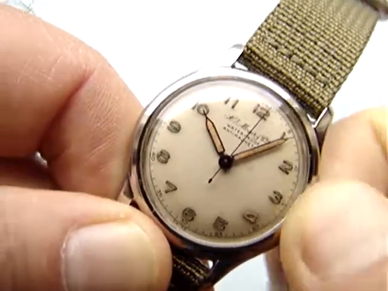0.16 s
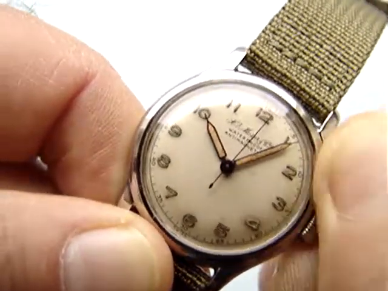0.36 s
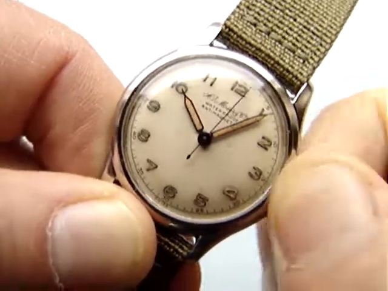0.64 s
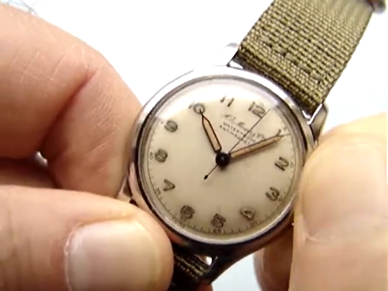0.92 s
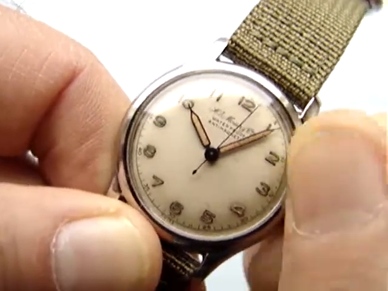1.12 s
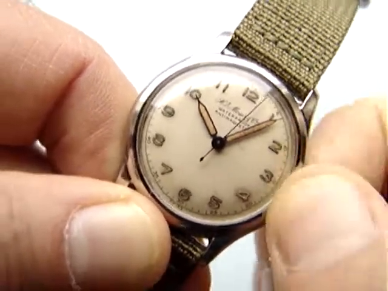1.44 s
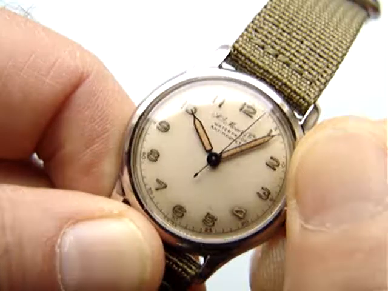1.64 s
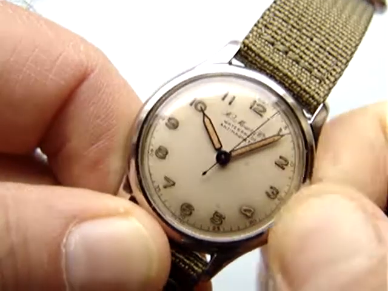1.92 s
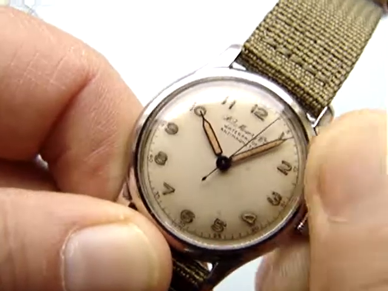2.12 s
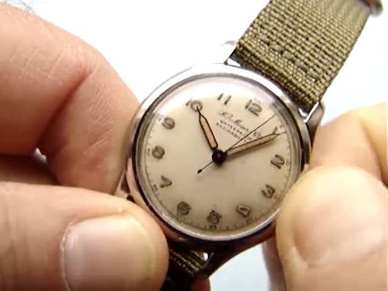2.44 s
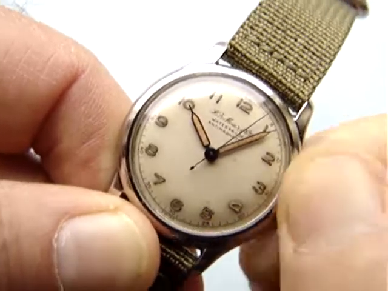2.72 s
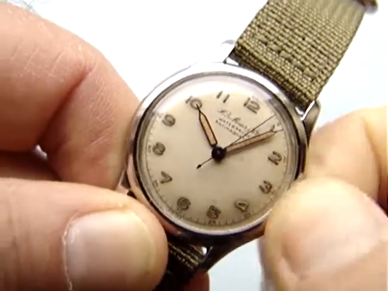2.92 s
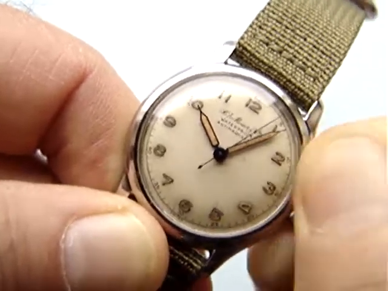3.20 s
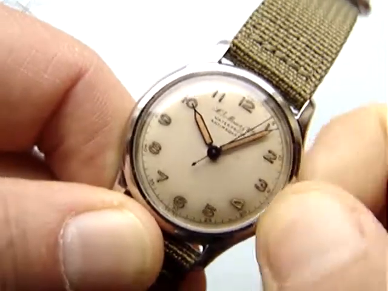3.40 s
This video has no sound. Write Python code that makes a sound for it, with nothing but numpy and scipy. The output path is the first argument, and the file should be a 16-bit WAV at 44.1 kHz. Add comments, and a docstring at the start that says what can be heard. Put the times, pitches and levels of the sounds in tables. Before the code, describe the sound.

Close to the microphone, fingers wind a watch back and forth, making quick bursts of dry ratchet clicks, fuller and thinner by turns. Light handling taps and skin rubs sit over the hiss of a quiet room.

```python
"""Short runs of crisp little clicks: a wristwatch is wound by hand, close up in a quiet room.
The crown (the winding knob) is rolled to and fro. On winding strokes a tiny catch, the pawl, snaps
over a toothed wheel and rings the case; on return strokes the clutch slips with thinner clicks.
Fingers rub on the crown between strokes. Soft handling bumps, light taps and one thin squeak
sound over steady room hiss, a faint hum and a low rush that swells and fades."""
import sys
import numpy as np
from scipy import signal
from scipy.fft import rfft, irfft, next_fast_len
from scipy.io import wavfile
from scipy.ndimage import uniform_filter1d, map_coordinates

SR = 44100
rng = np.random.default_rng(int(sys.argv[2]) if len(sys.argv) > 2 else 0)


def dump(signal):
    """Clip the signal to [-1, 1] and save it as 16-bit WAV at the path in sys.argv[1]."""
    limited = np.clip(np.atleast_2d(signal).T, -1, 1)
    pcm = np.round(limited * 32767).astype(np.int16)
    wavfile.write(sys.argv[1], SR, pcm)


N = 156996
TIME = np.arange(N) / SR


def amp(db):
    """Turn decibels into a number to multiply by."""
    return 10 ** (np.asarray(db) / 20)


def unit(x):
    """Scale a sound to an average strength (rms) of 1."""
    return x / np.sqrt(np.mean(x ** 2) + 1e-20)


def add(track, s, sound):
    """Mix a sound into the track, starting at s seconds."""
    i = max(round(s * SR), 0)
    track[i:i + len(sound)] += sound[:max(len(track) - i, 0)]


def filtered(x, response):
    """Turn each frequency in x up or down by response(hz)."""
    size = next_fast_len(N + 8192)
    hz = np.fft.rfftfreq(size, 1 / SR)
    return irfft(rfft(x, size) * response(hz), size)[..., :N]


def coloured(x, colour):
    """Give x a tone colour (which pitches are strong or weak), at strength 1."""
    points_hz, db = np.transpose(colour)
    return unit(filtered(x, lambda hz: amp(np.interp(np.log(hz + 1), np.log(points_hz), db))))


def wobble(rate):
    """A smooth random curve through `rate` new values a second."""
    points = rng.standard_normal(int(N * rate / SR) + 4)
    return map_coordinates(points, [TIME * rate])


def ring(tones, t, scatter_db=1.2, detune=.005):
    """A struck part's tones differ a little on every blow; each drops 60 dB in its ring time."""
    hz, db, ring_s = np.transpose(tones)[:, :, None]
    size, pitch = rng.standard_normal((2, len(tones), 1))
    t = np.maximum(t, 0)
    fade = amp(db + scatter_db * size - 60 * t / ring_s)
    return (fade * np.sin(2 * np.pi * hz * (1 + detune * pitch) * t)).sum(0)


# Tone colour of the room noise (frequency [Hz], relative level [dB])
ROOM_COLOUR = [(25, -20.5), (38, -17.5), (50, -7), (62, -5), (78, -11), (100, -3), (135, -3), (200, -0.5),
               (400, -4), (620, -5.5), (1150, -9), (2100, -11), (2300, -7.5), (2450, -10.5), (2750, -12.5),
               (3400, -12), (4000, -13), (4500, -26.5), (5200, -51)]
# Humming tones (frequency [Hz], level [dB])
HUM_TONES = [(57, -83), (133, -73.5), (168, -71.5), (219, -74)]
def room():
    """Steady low room noise with a slightly wavering hum."""
    air = amp(-59) * coloured(rng.standard_normal(N), ROOM_COLOUR)
    hum = sum(amp(db) * np.sqrt(2) * np.sin(2 * np.pi * hz * TIME + .65 * wobble(12))
              for hz, db in HUM_TONES)
    return air + hum


# Tone colour of the hiss (frequency [Hz], relative level [dB])
HISS_COLOUR = [(3600, -30), (4300, -5), (4700, -2), (5150, -.5), (5600, -3), (6400, -2), (8000, -2.5),
               (9600, -3), (10200, -4), (13000, -12)]
def hiss(whine_hz=6414, dip_db=-31, before_s=.0216, after_s=.0282):
    """High hiss with a thin whine; both dip briefly around each winding or return click."""
    noise = amp(-63.6) * coloured(rng.standard_normal(N), HISS_COLOUR)
    whine = amp(-74) * np.sqrt(2) * np.sin(2 * np.pi * whine_hz * TIME + .6 * wobble(50))
    near_click = np.zeros(N)
    for s, *_ in WINDING_CLICKS + RETURN_CLICKS:
        add(near_click, s - before_s, np.ones(round((before_s + after_s) * SR)))
    gain = uniform_filter1d(amp(dip_db * (near_click > 0)), round(.0025 * SR))  # soften the edges
    return gain * (noise + whine)


def friction(rows, colour, grain_db):
    """Skin grips metal unevenly, making grainy noise in strokes that start and stop softly."""
    strokes = sum(amp(db) / (1 + (2 * (TIME - s) / length) ** 4) for s, length, db in rows)
    grainy = rng.standard_normal(N) * amp(grain_db * wobble(800))
    return strokes * coloured(grainy, colour)


# Finger rubs (middle time [s], length [s], level [dB])
RUB_STROKES = [(0.018, 0.0175, -54.5), (0.41, 0.0234, -51), (0.535, 0.0203, -47), (0.692, 0.0154, -59.5),
               (1.24, 0.015, -54.5), (1.832, 0.0386, -55), (2.318, 0.0173, -47), (2.829, 0.0141, -49.5),
               (3.178, 0.0216, -55.5), (3.294, 0.0145, -52.5), (3.457, 0.0179, -58)]
# Their tone colour (frequency [Hz], relative level [dB])
RUB_TONE = [(1500, -40), (2200, -6), (2800, 7), (3500, -7), (4300, -11), (5100, -5), (5700, -14), (7000, 0),
            (7600, -1), (8300, 6), (9000, 9), (9600, 5), (10500, -6)]
def finger_rubs():
    """Fingers slide on the crown with a short, bright rasp."""
    return friction(RUB_STROKES, RUB_TONE, grain_db=4)


SLIDE_S, RISE_S = .0034, .00006  # a tooth slides just before the snap; the ringing then builds up
def snap(tones, bounce_db=-12, chatter_db=-1):
    """One steel part's share of a click: a slide, a snap and one bounce, with a fine rattle."""
    t = np.arange(SR // 40) / SR
    since_snap = t - SLIDE_S
    bounce_s = .0024 * (1 + .2 * rng.uniform(-1.056, 1))
    bounce_gain = amp(bounce_db + 2 * rng.normal())
    ringing = ring(tones, since_snap) + bounce_gain * ring(tones, since_snap - bounce_s)
    ringing *= 1 - np.exp(-np.maximum(since_snap, 0) / RISE_S)
    # the rattle grows during the slide and dies away after the snap
    rattle_db = np.where(since_snap < 0, -7.5 + 4500 * since_snap, -60 * since_snap / .011)
    rattle = rng.standard_normal(len(t)) * amp(rattle_db)
    muted = ring(tones, t) * amp(-60 * t / .009)  # parts that still touch mute each other
    chatter = signal.fftconvolve(rattle, muted)[:len(t)]
    # nothing of the part sounds below its lowest tone
    low_cut = signal.butter(6, tones[0][0] * .95, 'highpass', fs=SR, output='sos')
    click = signal.sosfilt(low_cut, unit(ringing) + amp(chatter_db) * unit(chatter))
    return click * np.sqrt(.005 * SR / np.sum(click ** 2))  # as much energy as 5 ms at strength 1


# Ringing tones of three steel parts (frequency [Hz], relative level [dB], ring time [s])
PAWL_TONES = [(8400, -1.5, .012), (8850, 0, .009), (9310, -2, .009), (9870, -10, .012)]
PLATE_TONES = [(4780, -8, .009), (5100, -2.5, .011), (5780, -8, .009), (6430, -5, .009), (6820, -2.5, .01),
               (7270, 1.5, .01), (7650, -7, .007)]
CASE_TONES = [(2300, -16, .009), (2790, 0, .008), (3650, -15, .006), (4100, -7, .008), (4620, -9, .007)]
def clicks(rows, pawl_db, plate_db, case_db, light=False):
    """Each tooth rings the pawl, the plate holding the gears and the case, each at its own volume."""
    case_tones = CASE_TONES[:2] if light else CASE_TONES  # a light touch rings only the lowest two
    track = np.zeros(N)
    for s, base_db, plate_extra, case_extra in rows:
        pawl = amp(pawl_db) * snap(PAWL_TONES)
        plate = amp(plate_db + plate_extra) * snap(PLATE_TONES)
        case = amp(case_db + case_extra) * snap(case_tones, bounce_db=-22, chatter_db=-12)
        add(track, s - SLIDE_S - 2 * RISE_S, amp(base_db) * (pawl + plate + case))
    return track


# Winding clicks (time [s], base level [dB], extra for the plate [dB], extra for the case [dB])
WINDING_CLICKS = [(0.0586, -39.5, -3, 0), (0.0753, -34, -32.5, -6.5), (0.0934, -35.5, -6, -5),
                  (0.115, -43.5, -0.5, -1), (0.1516, -45.5, 4, 3.5), (0.574, -35, -9, -4.5),
                  (0.6141, -36.5, -11.5, -4), (0.6437, -36.5, -11, -9), (0.6749, -36.5, -10, -2),
                  (0.7586, -39, -6.5, -5.5), (1.2859, -35, -12.5, -10), (1.304, -41, -3.5, 2.25),
                  (1.3276, -37, -10.5, -2.5), (1.3637, -39.5, -2, 0), (1.4038, -38.5, -0.5, -4),
                  (1.8759, -34, -8.5, -6.5), (1.8954, -40.5, -6, 1), (1.9138, -35, -8.5, -3.5),
                  (1.94, -36, -4.5, -4), (2.3597, -35.5, -6.5, -1), (2.3805, -38.5, -7.5, 1.5),
                  (2.3987, -43, 1, 3.5), (2.419, -37, -3.5, -3.5), (2.8552, -36, -17.5, 0.7),
                  (2.8682, -34.5, -7.5, -6.5), (2.8821, -34.5, -3.5, -5.5), (2.8969, -46.5, 3, 9.5),
                  (2.92, -33, -9.5, -14), (3.3372, -32.5, -8, -6.5), (3.374, -39, -1.5, 1.3),
                  (3.394, -38, -9, 1.5), (3.4095, -49, 10.5, 9.5), (3.423, -39, -13, 0.5),
                  (3.4442, -37, -5.5, -2.5)]
def winding():
    """The pawl snaps over the toothed wheel and rings the case."""
    return clicks(WINDING_CLICKS, pawl_db=-5, plate_db=-3.5, case_db=-5)


def knocks(rows, tones, rise_s):
    """Soft knocks whose ringing takes a moment to build up."""
    track = np.zeros(N)
    t = np.arange(SR // 4) / SR
    rise = 1 - np.exp(-t / rise_s)
    for s, db in rows:
        add(track, s, amp(db) * rise * ring(tones, t, scatter_db=2, detune=.0089))
    return track


# Handling bumps (time [s], base level [dB])
BUMP_HITS = [(0.085, -48), (2.916, -44)]
# Their tones (frequency [Hz], relative level [dB], ring time [s])
BUMP_TONES = [(177.3, -15, 0.09), (730.4, 0.5, 0.114), (777, 3, 0.0395), (1129.3, -3.5, 0.043),
              (1665, 0.5, 0.0397)]
def bumps():
    """Handling the watch makes dull bumps."""
    return knocks(BUMP_HITS, BUMP_TONES, rise_s=.00205)


# Faint ticks (time [s], base level [dB], extra for the case [dB])
SLACK_TICKS = [(0.239, -64, 8), (0.5345, -55, 7.5), (1.2519, -53, -3.5), (1.841, -58.5, 1.5),
               (2.037, -58.5, 1.5), (2.543, -62, 7.5), (2.831, -56, 3.5), (3.296, -50.5, -11.5)]
def gear_slack():
    """The gears tick faintly as they take up slack."""
    rows = [(s, db, -7, case_extra) for s, db, case_extra in SLACK_TICKS]
    return clicks(rows, pawl_db=-3, plate_db=4.5, case_db=2, light=True)


# Return clicks (time [s], base level [dB], extra for the plate [dB])
RETURN_CLICKS = [(0.3138, -39, -4.5), (0.3302, -40.5, -1.76), (0.346, -41.5, -0.5), (0.3632, -44, 2),
                 (0.3784, -38.5, -5.5), (0.9903, -40.5, -4), (1.013, -39.5, -3.5), (1.0344, -40.5, -3),
                 (1.0556, -40.5, -1.5), (1.077, -37, -9), (1.6047, -39.5, -4), (1.6201, -43.5, -1.5),
                 (1.6339, -38.5, -3.5), (1.649, -41.5, -1.5), (1.6676, -37.5, -8), (2.109, -38, -7),
                 (2.1254, -41.5, -1), (2.1414, -40.5, -1.9), (2.1554, -38, -7), (2.1687, -37.5, -5.5),
                 (2.607, -38, -6.5), (2.6232, -38, -4.5), (2.642, -38.5, -4.5), (2.6682, -37.5, -8.5),
                 (3.0666, -39, -3), (3.0803, -38.5, -5), (3.0973, -42.5, 1), (3.114, -40, -3.5),
                 (3.1285, -37, -5), (3.1431, -38.5, -2.5), (3.159, -37.5, -4)]
def slipping_clutch():
    """As the crown rolls back, the clutch slips with thin clicks that hardly ring the case."""
    rows = [(s, db, plate_extra, -17) for s, db, plate_extra in RETURN_CLICKS]
    return clicks(rows, pawl_db=-3.5, plate_db=-2.5, case_db=-3, light=True)


# Skin scuffs (middle time [s], length [s], level [dB])
SCUFF_STROKES = [(0.415, 0.065, -63), (3.158, 0.0355, -52.5)]
# Their tone colour (frequency [Hz], relative level [dB])
SCUFF_TONE = [(300, -15), (650, -4), (1000, -3.5), (1400, -5), (1800, -4.5), (2700, -6.5), (4000, -12),
              (9000, -50)]
def scuffs():
    """Skin brushes the case, duller than the rubs on the crown."""
    return friction(SCUFF_STROKES, SCUFF_TONE, grain_db=2)


# Light taps (time [s], base level [dB])
TAP_HITS = [(0.635, -40), (1.7365, -40)]
# Their tones (frequency [Hz], relative level [dB], ring time [s])
TAP_TONES = [(1071, -4.5, 0.0206), (1486, -1.5, 0.018), (1562.4, -3.5, 0.0282), (2382, -20.5, 0.047)]
def taps():
    """Light touches ring higher and shorter than the bumps."""
    return knocks(TAP_HITS, TAP_TONES, rise_s=.00139)


# Rise and fall of the squeak (share of its length [0 to 1], strength [0 to 1])
SQUEAK_OUTLINE = [(0, 0.114), (.14, 0.92), (.4, 0.94), (.55, 0.46), (1, 0.0033)]
def squeak(start_s=.8456, length_s=.1, hz=2854, sag_hz=30):
    """A thin raspy tone, barely there at first, swells, sags in pitch and fades."""
    progress = np.clip((TIME - start_s) / length_s, 0, 1)
    phase = 2 * np.pi * np.cumsum(hz - sag_hz * progress) / SR + .3 * wobble(330)
    rasp = amp(-54 + 3 * wobble(300))
    return rasp * np.interp(progress, *np.transpose(SQUEAK_OUTLINE)) * np.sin(phase)


# Loudness of the low rush (time [s], level [dB])
RUSH_LEVELS = [(1.6, -76), (1.9, -65), (2.27, -60), (2.5, -64), (2.9, -71.5), (3.5, -76.5)]
# Its tone colour (frequency [Hz], relative level [dB])
RUSH_COLOUR = [(200, -32), (330, -1.5), (385, -4), (435, -1.5), (480, -6.5), (540, -14), (620, -8),
               (850, -47.5)]
def low_rush():
    """A low rush slowly swells and fades in the background."""
    swell = amp(np.interp(TIME, *np.transpose(RUSH_LEVELS)))
    return swell * coloured(rng.standard_normal(N), RUSH_COLOUR)


# Changes of grip (middle time [s], length [s], level [dB])
GRIP_MOVES = [(2.94, 0.045, -53.5), (3.36, 0.392, -63.5)]
# Their tone colour (frequency [Hz], relative level [dB])
GRIP_COLOUR = [(100, -30), (150, -3.5), (178, 0), (230, 1), (320, -13.5), (600, -56.5)]
def grip_shifts():
    """The hands rumble softly as they shift their grip."""
    return friction(GRIP_MOVES, GRIP_COLOUR, grain_db=-.5)


def scene():
    """The watch, the hands and the room, mixed into one channel."""
    watch = winding() + slipping_clutch() + gear_slack()
    hands = finger_rubs() + bumps() + scuffs() + taps() + squeak() + grip_shifts()
    background = room() + hiss() + low_rush()
    return (watch + hands + background)[None]


# How the highest sounds are turned down (frequency [Hz], gain [dB])
TREBLE_CUT = [(9880, 0), (10030, -5), (10150, -20), (10300, -34), (11000, -41), (12300, -48)]
def record(dry):
    """The recorder steeply weakens the highest treble and keeps nothing above 12300 Hz."""
    return filtered(dry, lambda hz: amp(np.interp(hz, *np.transpose(TREBLE_CUT))) * (hz < 12300))


dry = scene()
out = record(dry)
dump(out)
```